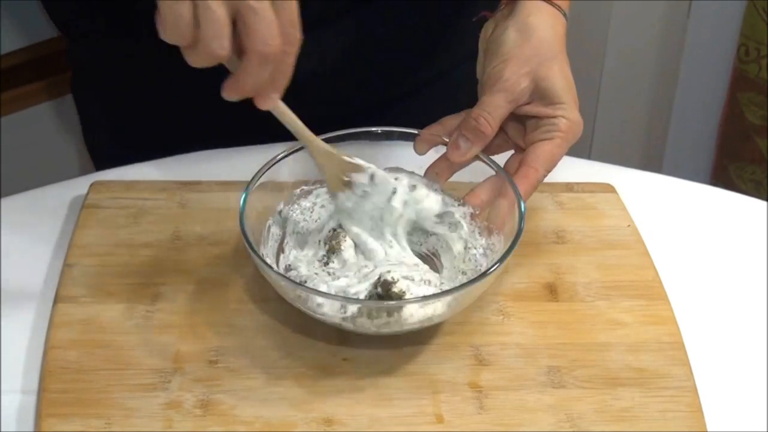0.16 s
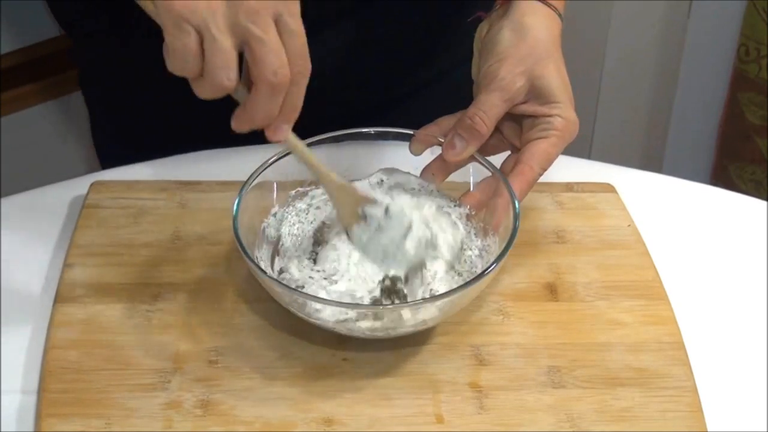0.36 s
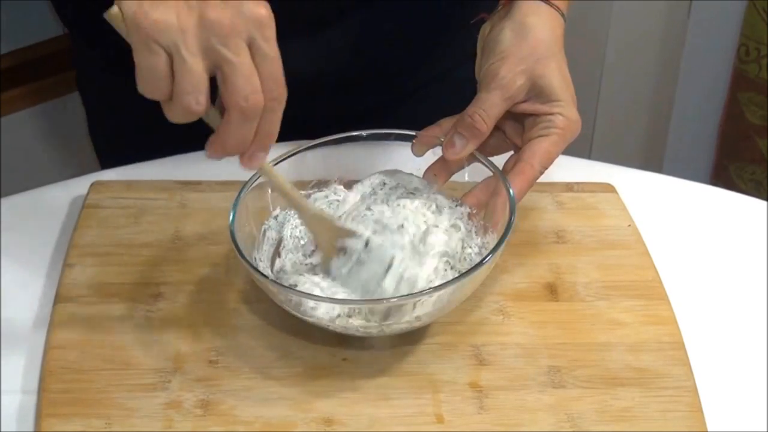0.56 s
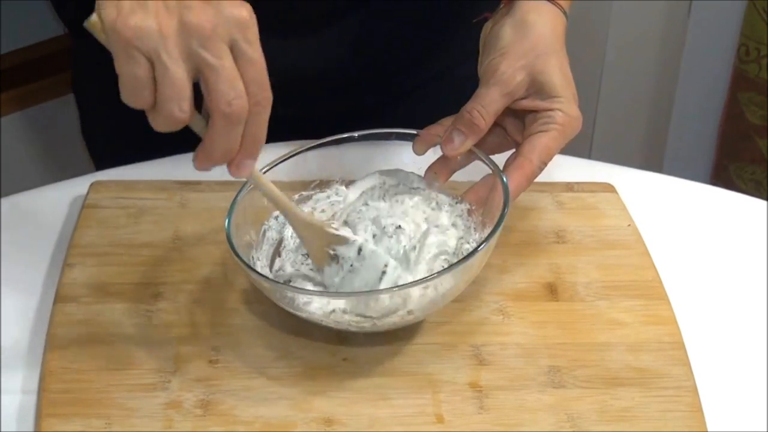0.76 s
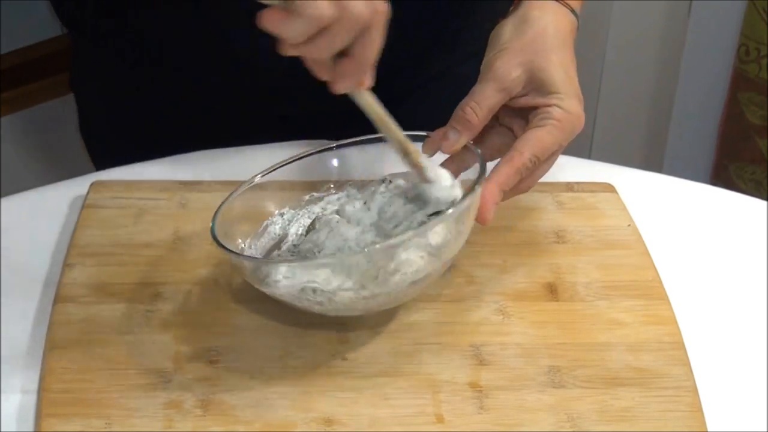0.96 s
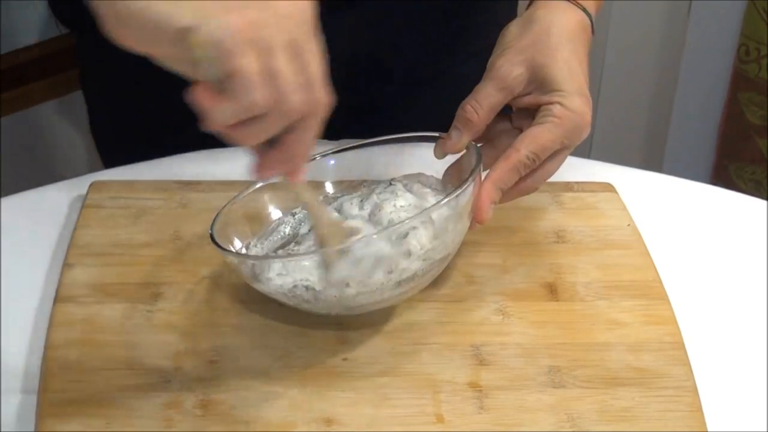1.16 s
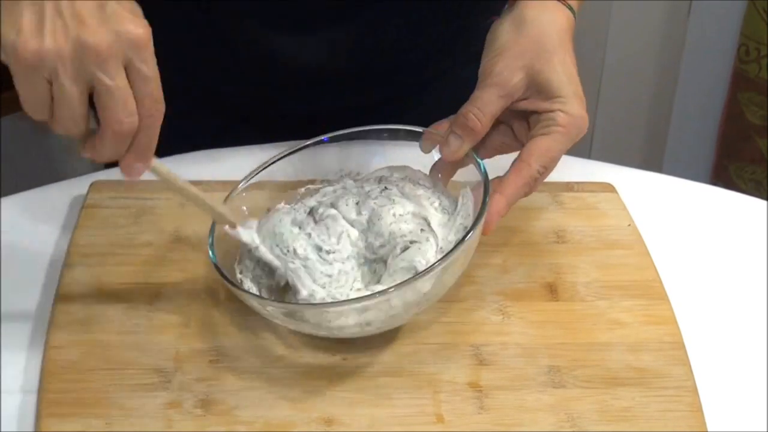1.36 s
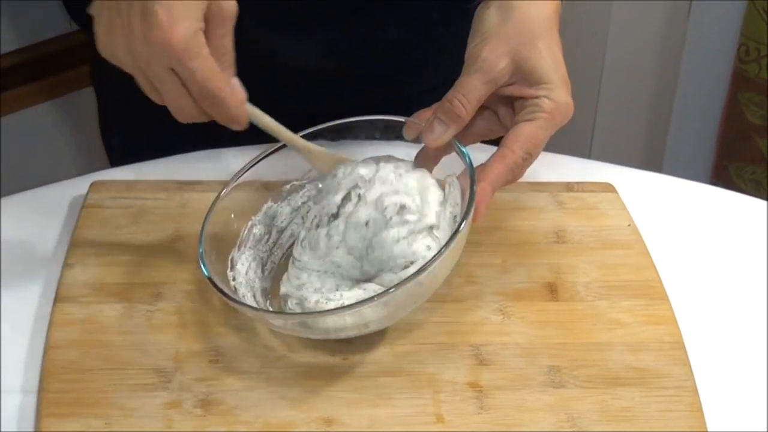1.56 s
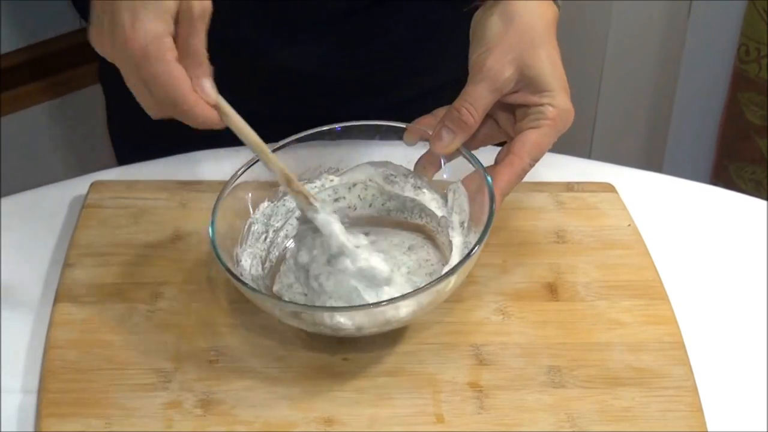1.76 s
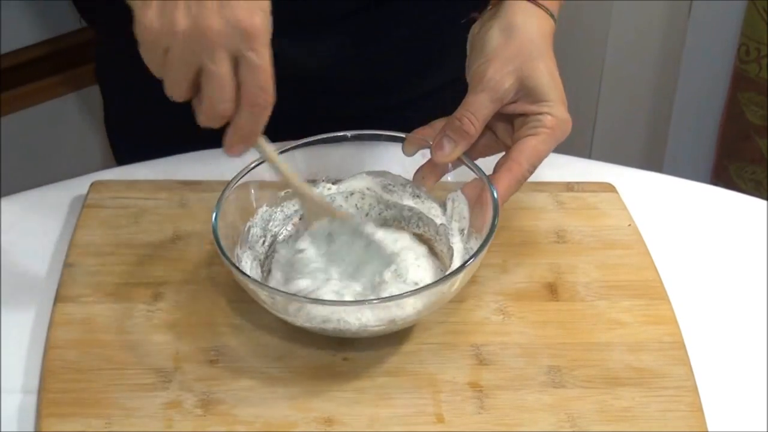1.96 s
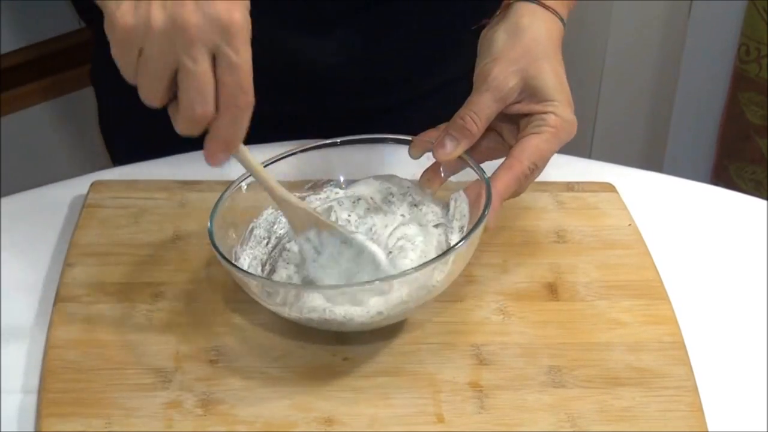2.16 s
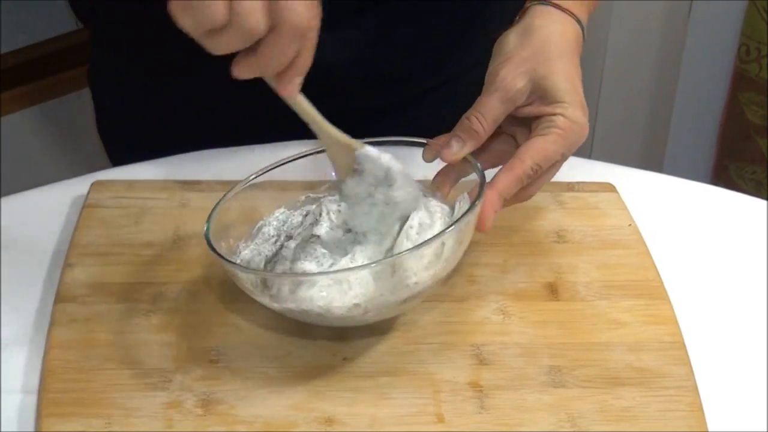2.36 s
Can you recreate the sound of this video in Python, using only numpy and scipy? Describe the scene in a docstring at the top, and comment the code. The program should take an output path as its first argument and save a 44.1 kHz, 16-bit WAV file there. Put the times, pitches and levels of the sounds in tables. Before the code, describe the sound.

A wooden spoon stirs thick paste in a glass bowl, knocking irregularly with soft wet smacks.

```python
"""A small kitchen: a wooden spoon stirs a thick mixture in a hand-held glass bowl on a cutting board.
Each knock rings the damped bowl and the spoon and thumps the board. The paste drags and crackles, smacks
as air pockets snap open and squelches as the spoon slips through; wood squeaks once on the glass.
Mains hum and a faint hiss lie underneath."""
import sys
import numpy as np
from scipy import signal
from scipy.fft import rfft, irfft
from scipy.io import wavfile
from scipy.ndimage import uniform_filter1d

SR = 44100
rng = np.random.default_rng(int(sys.argv[2]) if len(sys.argv) > 2 else 0)


def int16_out(signal):
    """Quantize to a 16-bit WAV file."""
    q = np.round(np.clip(np.atleast_2d(signal).T, -1, 1) * 32767)
    wavfile.write(sys.argv[1], SR, q.astype(np.int16))


N = 110250
T = np.arange(N) / SR
HIT_T, ROOM_T = T[:int(.2 * SR)], T[:int(.7 * SR)]
CUTOFF_HZ = 16000

# mains hum partials: pitch_hz, level_db
HUM_PARTIALS = [(59.5, -63), (120, -74.5)]
# room rumble and hiss: frequency_hz, gain_db
ROOM_TONE_EQ = [(20, -19), (35, 0), (50, -40), (70, 8), (100, -9.5), (160, -9), (300, -5.5), (600, -11.5),
                (1200, -11), (3000, -20.5), (8000, -23.5), (15500, -26.5)]
# fader ride of the paste going round the bowl: time_s, level_db
STIR_LEVELS = [(0, -57.5), (.22, -62.5), (.33, -65), (.7, -65), (.98, -67.5), (1.12, -68), (1.25, -68.5),
               (1.45, -63.5), (1.64, -64.5), (1.85, -70.5), (2.1, -69.5), (2.3, -59.5), (2.5, -70.5)]
# dull drag of the paste: frequency_hz, gain_db
DRAG_EQ = [(50, -23), (140, 8), (300, 3), (500, 4), (1000, -6), (1700, -16.5), (3000, -10.5), (7000, -63),
           (16000, -31)]
# tiny bubbles bursting: frequency_hz, gain_db
CRACKLE_EQ = [(200, -18), (800, 4.5), (1500, -3), (2200, -13.5), (5000, -12), (8000, -16.5), (16000, -7)]
# spoon meets bowl: start_s, board_db, thock_db, thock_hz, glass_db, glass_hz, glass_lowpass_hz,
# spoon_db, spoon_hz, tick_db
KNOCK_CUES = [(0.02, -73, -47, 838, -48.5, 880, 1140, -80, 2800, -65.5),
              (0.0485, -50, -82, 790, -90, 800, 900, -91, 2200, -88),
              (0.0813, -37.5, -43.5, 814, -66, 790, 1200, -89, 2200, -79),
              (0.152, -46, -41.5, 518, -38.5, 1112, 1340, -59, 1840, -55),
              (0.3866, -35.5, -23.5, 856, -18, 896, 1840, -36, 2313, -39.5),
              (0.6143, -45, -39, 802, -38, 850, 1210, -51, 1820, -78),
              (0.6508, -57, -56, 744, -41, 803, 1620, -47, 2340, -82),
              (0.8117, -48, -45.5, 506, -48, 807, 1120, -50, 2384, -53.5),
              (0.8788, -53, -54, 1310, -60.5, 1240, 1800, -59.5, 3120, -61),
              (1.0448, -54.5, -48, 640, -44.5, 865, 1690, -55.5, 2350, -59),
              (1.1899, -55, -51, 1080, -62, 1082, 2200, -60, 2420, -64),
              (1.3746, -53, -50, 950, -45.5, 910, 2000, -43, 2316, -53),
              (1.383, -49, -42, 975, -58, 604, 1390, -46.5, 1590, -60),
              (2.004, -48, -35.5, 650, -39.5, 822, 970, -87, 1950, -73),
              (2.0118, -52.5, -44, 857, -43.5, 900, 1000, -67, 2000, -68),
              (2.2210, -43, -37.5, 894, -36, 951, 1560, -41, 2464, -49),
              (2.3606, -65, -59.5, 890, -64, 936, 1500, -64.5, 2800, -75)]
# thump of the cutting board: pitch_hz, gain_db, t60_s
BOARD_MODES = [(134, 3, 0.047), (209, -0.5, 0.078), (246, -9, 0.11), (270, -6, 0.12), (263, -4, 0.045),
               (340.2, -10, 0.17)]
# dead thock of wood on loaded glass: pitch_ratio, gain_db, t60_s
THOCK_MODES = [(1, 0, 0.014), (1.45, -3, 0.0068)]
# damped ring of the bowl, whose pitch shifts with where the paste lies: pitch_ratio, gain_db, t60_s
BOWL_MODES = [(.88, -7.5, 0.021), (1, 1.5, 0.029), (1.1, 7.5, 0.012), (1.3, -1.5, 0.025),
              (1.56, 4.5, 0.017), (1.8, 0.5, 0.01), (2.35, -6, 0.014)]
# clack of the spoon: pitch_ratio, gain_db, t60_s
SPOON_MODES = [(.76, 17.5, 0.015), (1, 11.5, 0.023), (1.18, 7.5, 0.019), (1.32, 8.5, 0.0091)]
# tick of the contact: frequency_hz, gain_db
TICK_EQ = [(1500, 5), (3000, 7), (4000, -0.5), (6500, -2.5), (10000, -15), (16000, -22)]
# air pockets snapping open: start_s, level_db, resonance_hz, resonance_db, t60_s
SMACK_CUES = [(0.1496, -49, 10200, 2, 0.017), (0.212, -59, 1200, 40, 0.024), (0.691, -66, 8000, 11, 0.016),
              (0.817, -53.5, 6650, 6.5, 0.15), (1.545, -68.5, 4300, 12, 0.023),
              (1.592, -62, 2940, 25, 0.0096), (1.630, -61, 1420, 38, 0.059),
              (1.709, -63.5, 4800, 28, 0.0073), (2.0612, -53, 8200, 10, 0.013),
              (2.0663, -47, 7800, 6, 0.0041), (2.0690, -39, 1860, 8, 0.0074),
              (2.3611, -58, 9200, -7, 0.008)]
# wet tone common to all smacks: frequency_hz, gain_db
SMACK_EQ = [(100, -28), (400, -33), (1000, -25), (1800, 10), (3500, 0.5), (7000, -1), (11000, -0.5),
            (16000, 3)]
# whistle of wood on glass: pitch_hz, level_db
SQUEAK_PARTIALS = [(2450, -70), (3763, -76), (5249, -66), (6955, -68.5), (8861, -71), (10987, -71)]
# reverb tail: band_hz, gain_db, t60_s
REVERB_BANDS = [(111, -4, 0.29), (264, 3, .36), (516, -5.5, 0.27), (1000, -3, 0.379), (2200, -0.5, 0.2),
                (5060, 0, 0.24), (12100, -5, .16), (15500, -32, .13)]
# slaps off near surfaces, one list each: delay_s, gain_db
ECHO_DELAYS_S = (.0037, .00978, .0196, .0375)
ECHO_GAINS_DB = (-8.5, -10.5, -13.5, -16.5)
# standing waves of the room, one list each: pitch_hz, gain_db, t60_s
ROOM_MODES_HZ = (140, 231, 277)
ROOM_MODES_DB = (-53, -47.5, -55.5)
ROOM_MODES_T60_S = (.55, .35, .3)
# lean of the microphone pair: frequency_hz, left_minus_right_db
MIC_BALANCE = [(60, -5), (140, -4.5), (300, 1.5), (550, 1), (780, 2), (1100, 1.5), (8000, -0.04),
               (13000, 0)]
# phase between the microphones: frequency_hz, left_lead_rad
MIC_PHASE = [(500, 0.19), (1500, 0.076), (3000, 0), (5500, 0.19), (9000, 0.57), (12000, 0)]


def from_db(db):
    """Decibels to gain."""
    return 10 ** (np.asarray(db) / 20)


def at_hz(curve, hz):
    """Reads a curve on a log-frequency axis."""
    points_hz, values = np.transpose(curve)
    return np.interp(np.log(hz + 1e-9), np.log(points_hz), values)


def roll_off(x, order, hz, kind="low"):
    """Butterworth low-pass or high-pass."""
    return signal.sosfilt(signal.butter(order, hz, kind, fs=SR, output="sos"), x)


def colour(x, eq):
    """Puts an EQ curve on noise; rms 1."""
    y = irfft(rfft(x) * from_db(at_hz(eq, np.fft.rfftfreq(len(x), 1 / SR))), len(x))
    return y / y.std()


def as_hit(x):
    """Scales a hit to the energy of 10 ms at rms 1."""
    return x / np.sqrt(np.sum(x ** 2) / (.01 * SR) + 1e-20)


def add(track, start_s, x):
    """Drops x into the track at its cue."""
    i = int(start_s * SR)
    track[i:i + len(x)] += x[:N - i]


def room_tone(noise_db=-62, side_db=-38):
    """Mains hum over a nearly mono bed of rumble and hiss."""
    mid, side = (colour(white, ROOM_TONE_EQ) for white in rng.standard_normal((2, N)))
    hum = sum(np.sqrt(2) * from_db(db) * np.sin(2 * np.pi * (hz * T + rng.random()))
              for hz, db in HUM_PARTIALS)
    return from_db(noise_db) * (mid + from_db(side_db) * side * [[1], [-1]]) + hum


def grains(per_s, spread_db):
    """Random clicks of uneven size."""
    sizes = from_db(spread_db * np.minimum(rng.exponential(1, N), 4)) * rng.choice([-1, 1], N)
    return sizes * (rng.random(N) < per_s / SR)


def stirring():
    """Paste drags round the bowl as tiny bubbles burst; both ride the same fader."""
    drag = colour(grains(per_s=2500, spread_db=.5), DRAG_EQ)
    crackle = colour(grains(per_s=92, spread_db=6), CRACKLE_EQ)
    fader = from_db(np.interp(T, *np.transpose(STIR_LEVELS)))
    return (drag + from_db(-12) * crackle) * fader


def struck(modes, pitch_scale=1, spread_db=2, attack_s=.00068):
    """Dying sines, balanced anew at every blow; the attack builds while the paste squeezes out."""
    offsets_db = rng.normal(0, spread_db, len(modes))
    ring = sum(from_db(db + offset - 60 * HIT_T / t60) * np.sin(2 * np.pi * hz * pitch_scale * HIT_T)
               for (hz, db, t60), offset in zip(modes, offsets_db))
    return ring * np.minimum(HIT_T / attack_s, 1)


def soft_blow(modes, pitch_hz):
    """Paste-coated wood excites little far above a part's pitch."""
    return roll_off(struck(modes, pitch_hz), 4, 1.696 * pitch_hz)


def burst(eq, t60_s):
    """A short dying crack of coloured noise."""
    return as_hit(colour(rng.standard_normal(len(HIT_T)), eq) * from_db(-60 * HIT_T / t60_s))


def knocks(radiates_above_hz=548, low_cut_hz=134.3):
    """Each blow layers board thump, thock, glass ring, spoon clack and tick; paste dulls the ring."""
    out = np.zeros(N)
    for (start_s, board_db, thock_db, thock_hz, glass_db, glass_hz, glass_lowpass_hz,
         spoon_db, spoon_hz, tick_db) in KNOCK_CUES:
        glass = roll_off(struck(BOWL_MODES, glass_hz), 2, radiates_above_hz, "high")
        layers = [(board_db, struck(BOARD_MODES)),
                  (thock_db, soft_blow(THOCK_MODES, thock_hz)),
                  (glass_db, roll_off(glass, 3, glass_lowpass_hz)),
                  (spoon_db, soft_blow(SPOON_MODES, spoon_hz)),
                  (tick_db, burst(TICK_EQ, t60_s=.028))]
        for db, layer in layers:
            add(out, start_s, from_db(db) * as_hit(layer))
    return roll_off(out, 4, low_cut_hz, "high")


def smacks(width_octaves=.33):
    """Air pockets in the paste snap open, each colouring its wet crack with its own resonance."""
    out = np.zeros(N)
    hz = np.geomspace(100, CUTOFF_HZ, 60)
    for start_s, level_db, resonance_hz, resonance_db, t60_s in SMACK_CUES:
        bell = np.exp(-.5 * (np.log2(hz / resonance_hz) / width_octaves) ** 2)
        eq_db = at_hz(SMACK_EQ, hz) + resonance_db * bell
        add(out, start_s, from_db(level_db) * burst(np.transpose([hz, eq_db]), t60_s))
    return out


def squelch(start_s=.8755, level_db=-46.5, pitch_hz=1864, sag_hz_per_s=3500, attack_s=.006, t60_s=.11):
    """The spoon slips through the paste with a wet chirp that sags as it dies."""
    out = np.zeros(N)
    envelope = np.minimum(HIT_T / attack_s, 1) * from_db(level_db - 60 * HIT_T / t60_s)
    phase = 2 * np.pi * np.cumsum(pitch_hz - sag_hz_per_s * HIT_T) / SR
    add(out, start_s, np.sqrt(2) * envelope * np.sin(phase))
    return out


def squeak(start_s=1.243, attack_s=.009, release_s=.099, pitch_wobble=.016):
    """Wood slips on the glass with a thin, unsteady whistle whose partials flutter."""
    envelope = np.interp(T - start_s, [0, attack_s, attack_s + release_s], [0, 1, 0])
    jitter = uniform_filter1d(rng.standard_normal((len(SQUEAK_PARTIALS) + 1, N)), size=200)
    *flutters, drift = jitter / jitter.std()
    warped_s = np.cumsum(1 + pitch_wobble * drift) / SR
    return envelope * sum(from_db(db) * (1 + .5 * flutter) * np.sin(2 * np.pi * hz * warped_s)
                          for (hz, db), flutter in zip(SQUEAK_PARTIALS, flutters))


def reflections(t60_s, onset_s=.0052, block=512):
    """A smooth dying wash of dense reflections with no frequency sticking out; energy 1."""
    phases = rng.random((len(ROOM_T) // block + 1, block // 2 + 1))
    wash = irfft(np.exp(2j * np.pi * phases), block).ravel()[:len(ROOM_T)]
    wash *= from_db(-60 * ROOM_T / t60_s) * np.clip(ROOM_T / onset_s - .5, 0, 1)
    return wash / np.linalg.norm(wash)


def room_tail():
    """Diffuse reverb, each band dying at its own rate, and a quick early scatter."""
    hz, spectrum = np.fft.rfftfreq(len(ROOM_T), 1 / SR), 0
    for band_hz, db, t60_s in REVERB_BANDS:
        share = at_hz([(centre, centre == band_hz) for centre, _, _ in REVERB_BANDS], hz)
        spectrum += from_db(db) * np.sqrt(share) * rfft(reflections(t60_s))
    fade = np.minimum(1, 2 - 2 * ROOM_T / ROOM_T[-1]) ** 2
    scatter = from_db(-7) * reflections(t60_s=.038)
    return irfft(spectrum, len(ROOM_T)) * fade + scatter


def kitchen(x):
    """Direct sound, near slaps, low standing waves and the room's tail."""
    response = room_tail()
    response[0] += 1
    for delay_s, db in zip(ECHO_DELAYS_S, ECHO_GAINS_DB):
        response[int(delay_s * SR)] += from_db(db)
    for hz, db, t60_s in zip(ROOM_MODES_HZ, ROOM_MODES_DB, ROOM_MODES_T60_S):
        response += from_db(db - 60 * ROOM_T / t60_s) * np.cos(2 * np.pi * hz * ROOM_T)
    return signal.fftconvolve(x, response)[:N] / np.sqrt(1 + np.sum(from_db(ECHO_GAINS_DB) ** 2))


def scene():
    """Bowl, spoon and paste, softened on top and set in the kitchen over its room tone."""
    foley = stirring() + knocks() + smacks() + squelch() + squeak()
    return kitchen(roll_off(foley, order=2, hz=14000)) + room_tone()


def record(dry):
    """Two close microphones differ a little in level and phase; the top is cut steeply."""
    hz, sides = np.fft.rfftfreq(2 * N, 1 / SR), np.array([[.5], [-.5]])
    pair = from_db(sides * at_hz(MIC_BALANCE, hz)) * np.exp(1j * sides * at_hz(MIC_PHASE, hz))
    stereo = irfft(rfft(dry, 2 * N) * pair)[:, :N]
    return signal.sosfilt(signal.ellip(10, .1, 70, CUTOFF_HZ, fs=SR, output="sos"), stereo)


dry = scene()
out = record(dry)
int16_out(out)
```